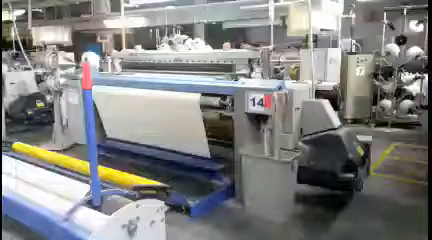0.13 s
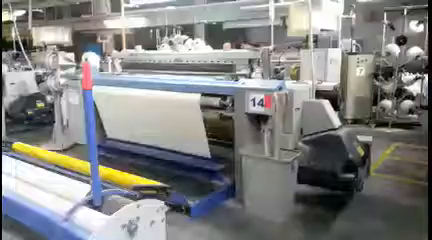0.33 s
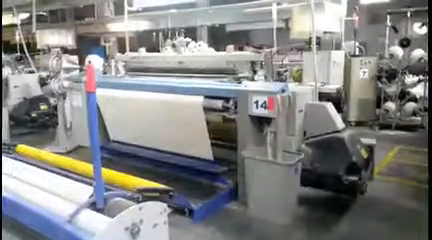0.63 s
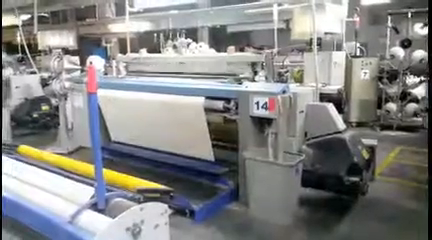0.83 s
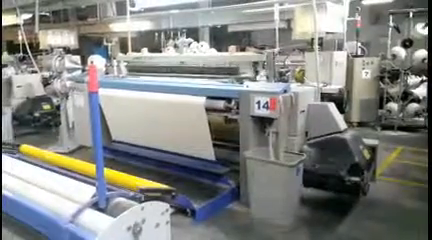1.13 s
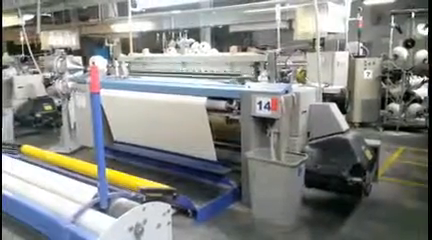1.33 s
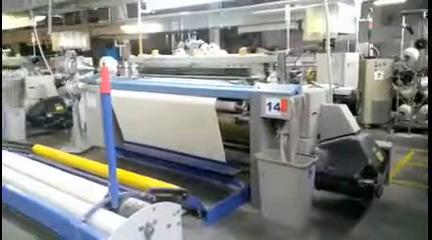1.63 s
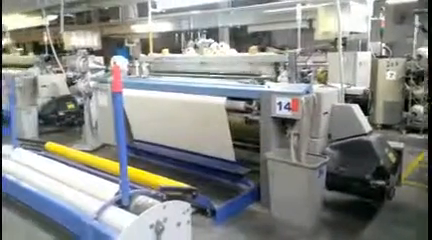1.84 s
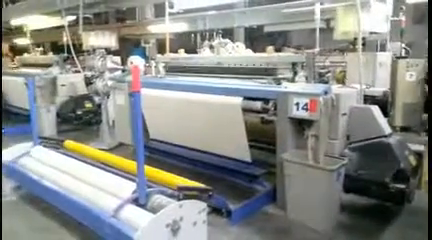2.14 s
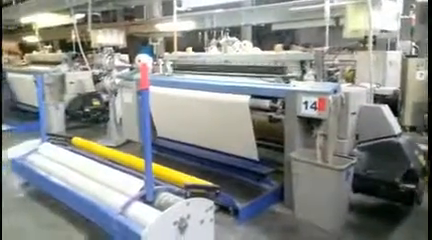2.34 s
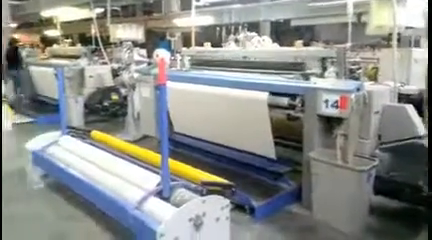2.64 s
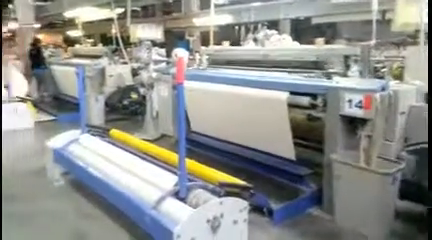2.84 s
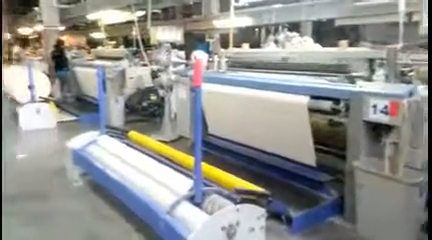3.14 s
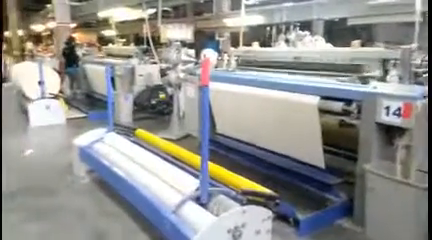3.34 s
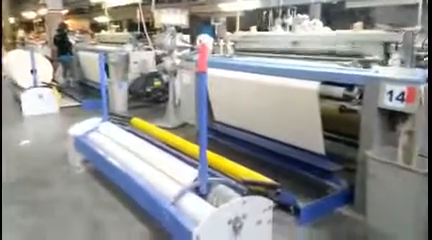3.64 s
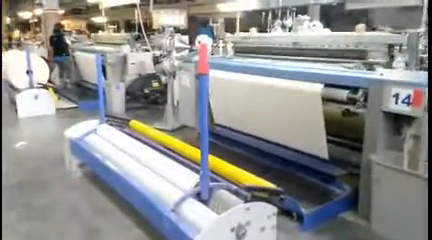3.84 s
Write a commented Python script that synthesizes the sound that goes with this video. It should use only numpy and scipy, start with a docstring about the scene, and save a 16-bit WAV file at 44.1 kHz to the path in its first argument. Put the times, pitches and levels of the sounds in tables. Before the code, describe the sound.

Loud textile looms clatter and hiss continuously, filling a factory with mechanical noise.

```python
"""A mill hall full of air-jet looms, heard from beside one that beats about 800 picks a minute. Each pick
forces the frame into harmonic vibration, knocks the reed and harness so that the hall rings briefly, and
releases a puff of turbulent air. Steel healds rattle at their resonances, and the other looms sum to a roar.
The microphone drifts along the aisle, and halfway through the treble dulls."""
import sys
import numpy as np
from scipy import signal
from scipy.fft import rfft, irfft
from scipy.io import wavfile
from scipy.ndimage import uniform_filter1d

SR = 44100
rng = np.random.default_rng(int(sys.argv[2]) if len(sys.argv) > 2 else 0)


def log_audio(samples):
    """Write samples as a 16-bit WAV file to the path given in sys.argv[1]."""
    # one column per channel
    frames = np.atleast_2d(samples).T
    # limit to full scale, then quantise
    limited = np.clip(frames, -1, 1)
    pcm = np.round(limited * 32767).astype(np.int16)
    wavfile.write(sys.argv[1], SR, pcm)


N = 176400
TIME = np.arange(N) / SR
PICK_HZ = 13.335   # a pick is one passage of the weft


def from_db(db):
    """Amplitude ratio: tenfold for every 20 dB."""
    return 10 ** (np.asarray(db) / 20)


def rms_one(x):
    """Normalisation to unit mean power."""
    return x / np.sqrt(np.mean(x ** 2) + 1e-20)


def at_hz(points, hz):
    """Interpolation of a table on a log-frequency axis."""
    table_hz, value = np.transpose(points)
    return np.interp(np.log(hz + 1e-9), np.log(table_hz), value)


def filtered(x, gain_at):
    """Zero-phase filtering: the spectrum is multiplied by a real gain at each frequency."""
    return irfft(rfft(x) * gain_at(np.arange(N // 2 + 1) * SR / N), N)


def coloured(x, spectrum):
    """Source and filter: a white excitation takes on a spectral density given in dB per Hz."""
    return filtered(rms_one(x), lambda hz: from_db(at_hz(spectrum, hz))) * np.sqrt(SR / 2)


def drift(corner_hz):
    """Low-passed noise: a slow random fluctuation of zero mean and unit spread."""
    return rms_one(filtered(rng.standard_normal(N), lambda hz: (hz > 0) / (1 + (hz / corner_hz) ** 2)))


def frame():
    """Periodic forcing shakes the frame at harmonics of the pick rate; standing waves vary their levels."""
    # line spectrum of the frame: harmonic, level_db
    harmonics = [(1, -1.5), (2, -0.5), (3, -1), (4, -5.5), (5, 0), (6, -5), (7, -11), (8, -0.5), (9, -14.5),
                 (10, -12), (11, -5), (12, -0.5), (13, -7), (14, -12.5), (15, -12), (16, -3.5), (17, -3.5),
                 (18, -11), (19, -5), (20, -0.5), (21, -5.5), (22, -2.5), (23, -5.5), (24, -7), (25, -5),
                 (26, -5.5), (27, -10), (28, -3), (29, -6), (30, -12)]
    # antinodes that the microphone crosses: harmonic, centre_s, half_width_s, rise_db
    antinodes = [(5, 1.8, 1.4, 7), (8, 0.89, 0.74, 8.5), (12, 3.8, 0.33, 13.5), (16, 3.4, 0.6, 4),
                 (21, 1.15, 0.98, 1), (23, 3.1, 0.42, 10)]
    gain_db, wander_db, wander_rad, wander_hz = -41, 1.4, .4, 0.57
    out = np.zeros(N)
    for harmonic, level_db in harmonics:
        phase = 2 * np.pi * (harmonic * PICK_HZ * TIME + rng.random()) + wander_rad * drift(wander_hz)
        swell_db = wander_db * drift(wander_hz)
        for antinode_harmonic, centre_s, half_width_s, rise_db in antinodes:
            if antinode_harmonic == harmonic:
                swell_db += rise_db * np.exp(-((TIME - centre_s) / half_width_s) ** 2)
        out += from_db(gain_db + level_db) * rms_one(from_db(swell_db) * np.sin(phase))
    return out


def knocks():
    """Impact excitation: each contact of reed and harness sets off its own dense, decaying ring in the hall,
    the same at every pick."""
    # contacts within one pick: offset_s, level_db
    contacts = [(.011, -3.5), (.025, -2), (.041, 1), (.056, -2), (.071, 0)]
    # spectrum of the ring: frequency_hz, density_db
    ring_spectrum = [(100, -74), (200, -62.5), (400, -66), (600, -63), (850, -60.5), (1220, -56.5),
                     (1800, -62), (3000, -73.5), (6000, -88), (12000, -95)]
    t60_s, spread_db, jitter_s = .04, 1.5, .00008
    picks_s, age_s = np.arange(0, N / SR, 1 / PICK_HZ), TIME[:SR // 4]
    out = np.zeros(N)
    for offset_s, level_db in contacts:
        timing, force = rng.standard_normal((len(picks_s), 2)).T
        blows_s = picks_s + offset_s + jitter_s * timing
        blows = np.zeros(N + SR)
        blows[(blows_s * SR).astype(int)] = from_db(level_db + spread_db * force)
        ring = rng.standard_normal(len(age_s)) * np.exp(-np.log(1000) * age_s / t60_s)
        out += signal.fftconvolve(blows[:N], ring)[:N]
    return coloured(out, ring_spectrum)


def jets():
    """Turbulence in the air jets that carry the weft makes a hiss, amplitude-modulated at the pick rate."""
    # spectrum of the hiss: frequency_hz, density_db
    hiss_spectrum = [(500, -79), (1500, -66), (3000, -65), (4200, -62), (5200, -62.5), (8000, -70),
                     (10500, -71.5), (13000, -71), (15500, -78)]
    # modulation depth of the puffs: time_s, swing_db
    puff_depth = [(.3, 2), (2.0, 2.8), (2.4, 3.5), (4, 4)]
    peak_s, spread_db = 0.049, 1.0
    swing_db = np.interp(TIME, *np.transpose(puff_depth))
    puffs = from_db(swing_db * np.cos(2 * np.pi * PICK_HZ * (TIME - peak_s)))
    puffs /= np.sqrt(uniform_filter1d(puffs ** 2, int(SR / PICK_HZ)))   # same power at any depth
    puffs *= from_db(spread_db * drift(PICK_HZ))
    return coloured(puffs * rng.standard_normal(N), hiss_spectrum)


def healds():
    """Resonance: random clicks drive the modes of the healds, which rise or fade as the microphone moves."""
    # modes of the steel healds: pitch_hz, bandwidth_hz, start_db, end_db
    modes = [(817, 15, -42, -45), (1215, 28, -42, -33.5), (1500, 95, -39, -33.5), (1633, 73, -48, -31),
             (1927, 56, -37, -37.5), (2420, 76, -43, -36), (3830, 87, -42, -34), (4020, 56, -35, -35),
             (4234, 50, -39, -28), (4400, 90, -39, -33), (4644, 120, -31, -40), (4980, 170, -29.5, -43),
             (12600, 200, -52, -54.5), (13100, 600, -48, -52)]
    clicks_per_s, spread_db = 900, 2.0
    out = np.zeros(N)
    for pitch_hz, bandwidth_hz, start_db, end_db in modes:
        clicks = (rng.random(N) < clicks_per_s / SR) * rng.choice([-1, 1], N)
        clicks = clicks * from_db(spread_db * rng.standard_normal(N))
        pole_radius = np.exp(-np.pi * bandwidth_hz / SR)
        feedback = [1, -2 * pole_radius * np.cos(2 * np.pi * pitch_hz / SR), pole_radius ** 2]
        ring = signal.lfilter([1, 0, -1], feedback, clicks + 1e-18)
        out += from_db(np.linspace(start_db, end_db, N)) * rms_one(ring)
    return out


def far_looms():
    """Incoherent summation: the other looms merge into a noise whose octaves flicker independently."""
    # spectrum of the roar: frequency_hz, density_db
    roar_spectrum = [(14, -50.5), (25, -64), (50, -65), (100, -55.5), (170, -56), (280, -55.5), (450, -59),
                     (650, -57), (900, -53.4), (1250, -51), (1800, -51.5), (2400, -53), (2950, -55),
                     (3400, -53), (3850, -50), (4250, -49.5), (4950, -51.7), (5400, -54), (6500, -59.5),
                     (8000, -65.5), (10500, -69.5), (12900, -70), (14300, -72.5), (15500, -79)]
    # unsteadiness of the roar: frequency_hz, spread_db
    flicker_depth = [(100, 2.5), (300, 1.4), (1000, 0.86), (4000, 0.42), (10000, .6)]
    gain_db, flicker_hz = -1.16, 9.4
    edges_hz = np.append(0, np.geomspace(SR / 256, SR / 2, 8))
    white, out = rng.standard_normal(N), np.zeros(N)
    for low, high in zip(edges_hz, edges_hz[1:]):
        flicker_db = at_hz(flicker_depth, (low + high) / 2) * drift(flicker_hz)
        out += filtered(white, lambda hz: (hz > low) & (hz <= high)) * from_db(flicker_db)
    return from_db(gain_db) * coloured(out, roar_spectrum)


def microphone_drift(sound):
    """Time-varying filtering: the balance of three bands shifts over time; treble and bass change as the
    microphone moves, and the midrange rises slightly after the treble dulls."""
    # course of each band: time_s, gain_db
    treble = [(0.36, 0.5), (1.72, -0.5), (2.085, 1), (2.12, -3), (2.2, -6.6), (2.38, -5.6), (2.5, -7.3),
              (2.74, -7.2), (2.82, -5.5), (2.91, -8.5), (3.0, -6.8), (3.14, -7.5), (3.26, -3.8),
              (3.36, -7.1), (3.45, -5.3), (3.58, -7), (3.66, -4.8), (3.8, -9), (3.9, -5.3)]
    midrange = [(.3, -0.055), (1, -0.29), (2.4, 0), (2.7, 0.81), (3.2, 1.0), (3.7, -.4), (4, 0.53)]
    bass = [(.3, 0), (1.3, 1.7), (2, -0.5), (2.8, 0.5), (3.3, -4), (4, -4)]
    # part of the sound that each band takes in: frequency_hz, share
    treble_band = [(4300, 0), (5000, 0.19), (6300, 0.26), (8000, 0.9), (10000, 0.99)]
    midrange_band = [(800, 0.16), (1300, 1), (2000, 0.54), (4200, 0.53), (5000, 0)]
    bass_band = [(130, 0.75), (220, 0.02)]
    for course, band in ((treble, treble_band), (midrange, midrange_band), (bass, bass_band)):
        gain = from_db(np.interp(TIME, *np.transpose(course)))
        sound = sound + (gain - 1) * filtered(sound, lambda hz: at_hz(band, hz))
    return sound


def scene():
    """Superposition of the near loom and the far ones at one microphone, alike in both channels."""
    mix = microphone_drift(frame() + knocks() + jets() + healds() + far_looms())
    return np.array([mix, mix])


def record(dry):
    """Compression partly evens the level and saturation rounds peaks; the sound cuts in, low-passed."""
    window_s, target_db, strength = 0.016, -14.5, 0.28
    ceiling, start_s, cutoff_hz = 0.94, 0.3017, 15700
    level = np.sqrt(uniform_filter1d(dry[0] ** 2, int(window_s * SR)))
    compressed = dry * (from_db(target_db) / level) ** strength
    rounded = ceiling * np.tanh(compressed / ceiling)
    low_pass = signal.ellip(12, .1, 80, cutoff_hz, fs=SR, output="sos")
    return signal.sosfilt(low_pass, rounded * (TIME >= start_s))


dry = scene()
out = record(dry)
log_audio(out)
```